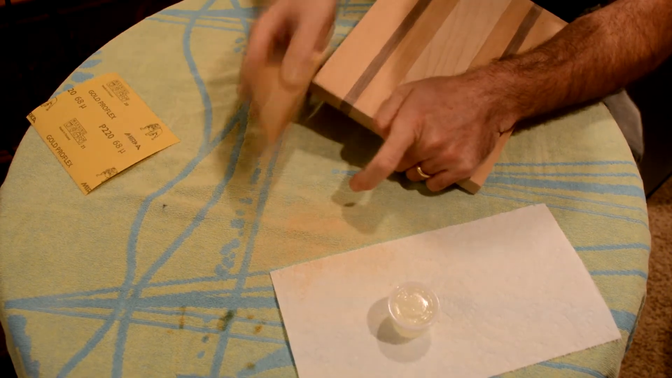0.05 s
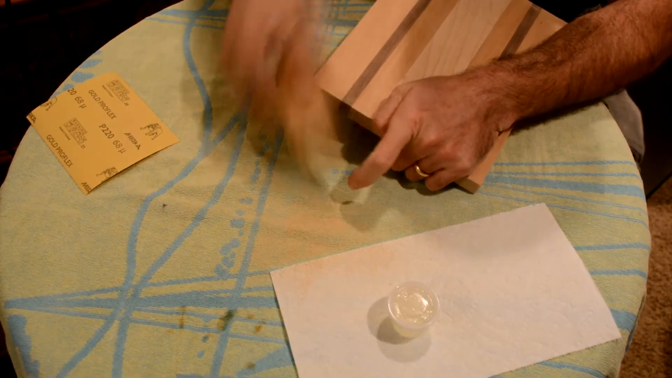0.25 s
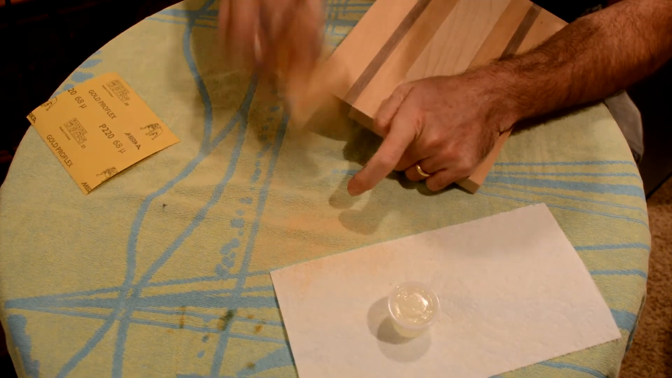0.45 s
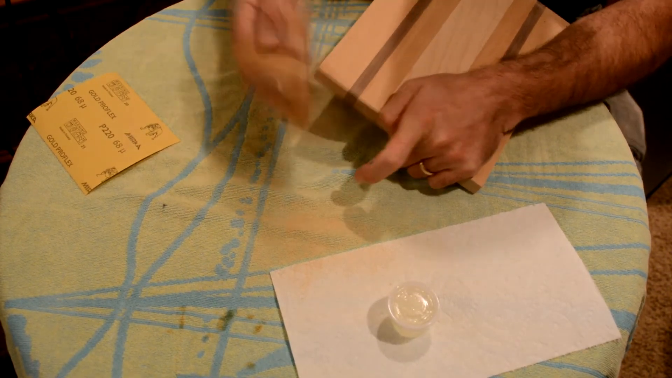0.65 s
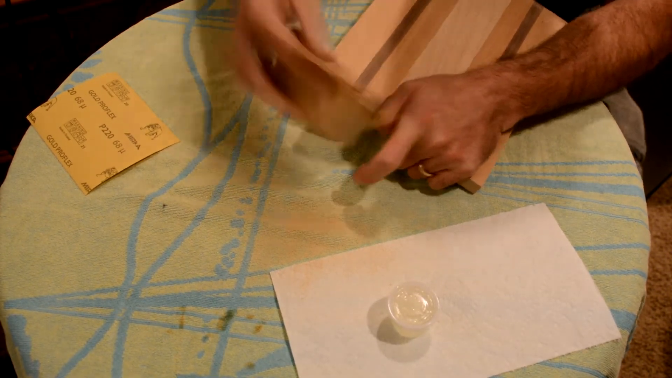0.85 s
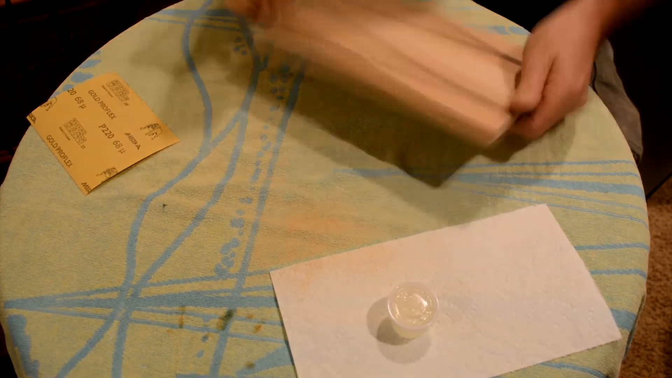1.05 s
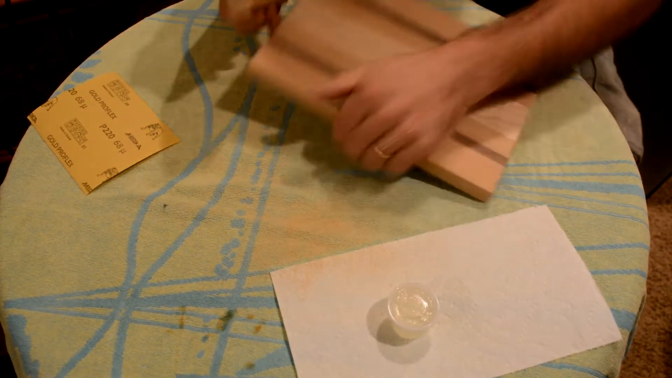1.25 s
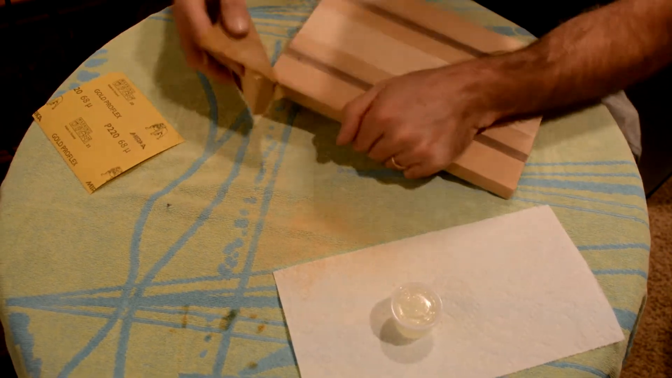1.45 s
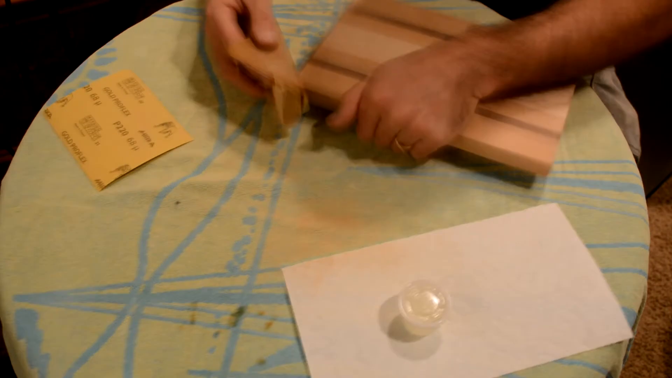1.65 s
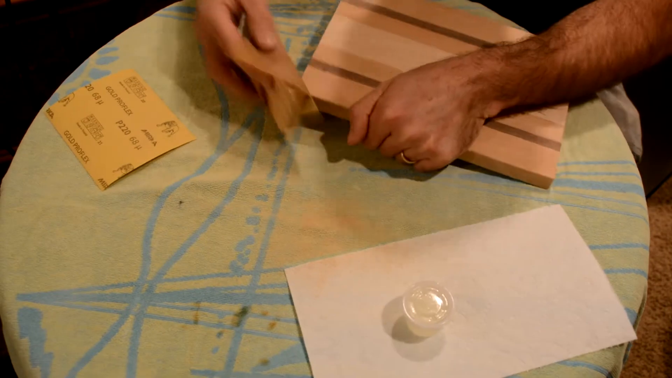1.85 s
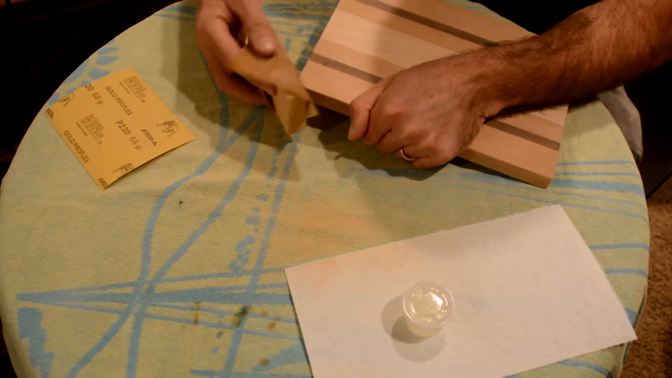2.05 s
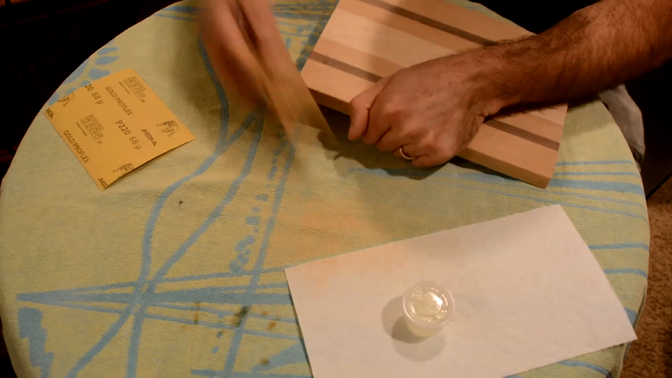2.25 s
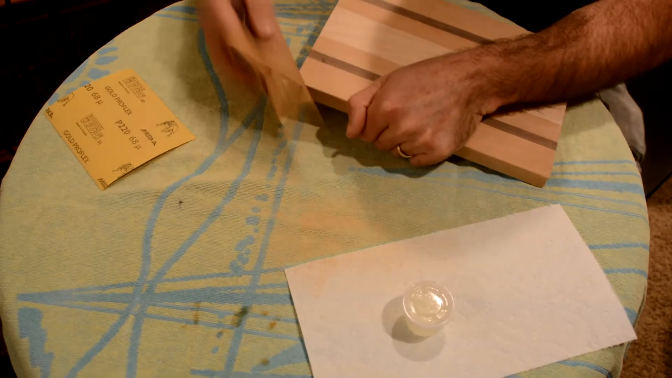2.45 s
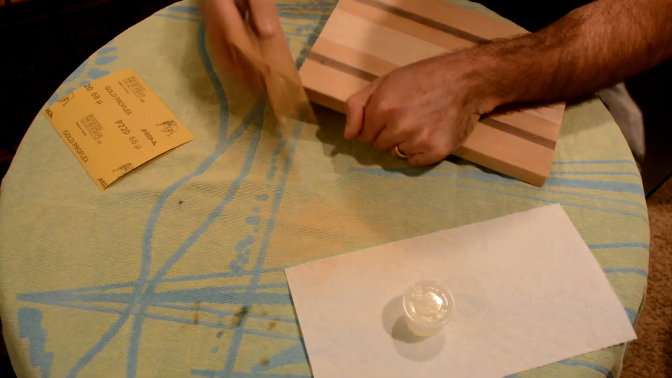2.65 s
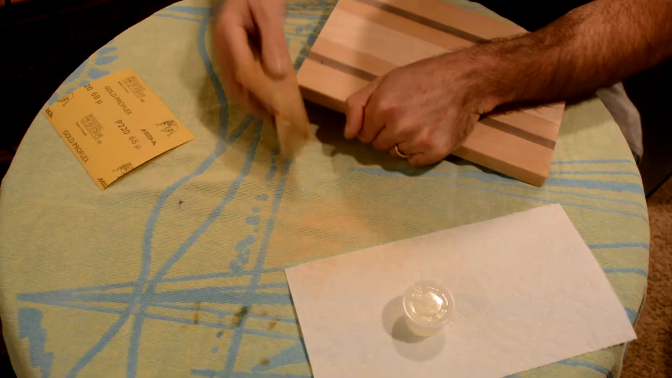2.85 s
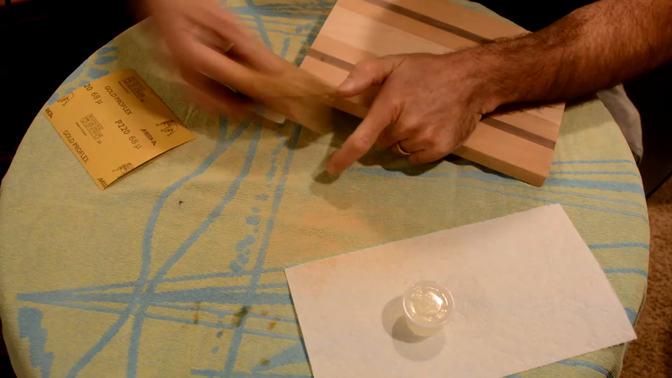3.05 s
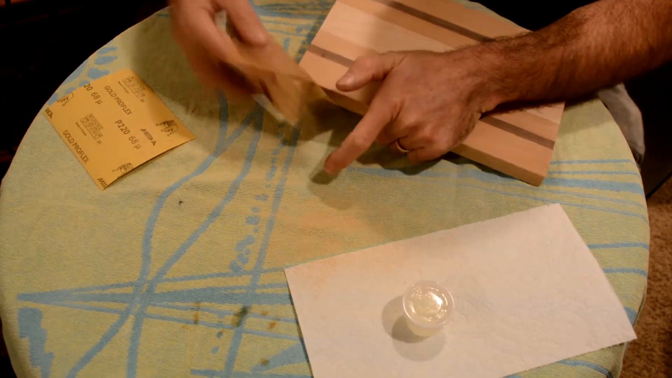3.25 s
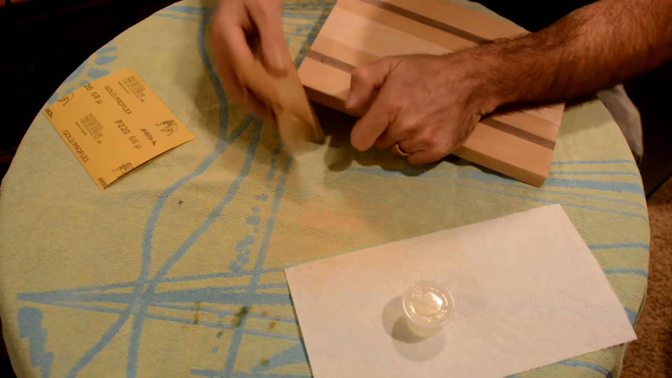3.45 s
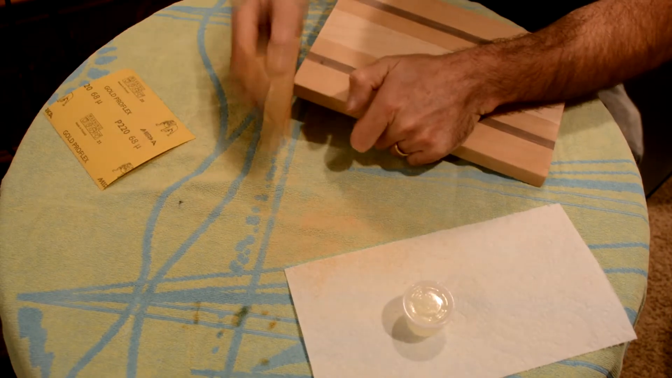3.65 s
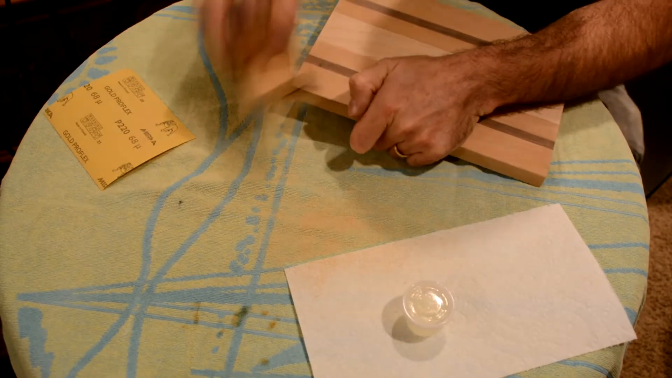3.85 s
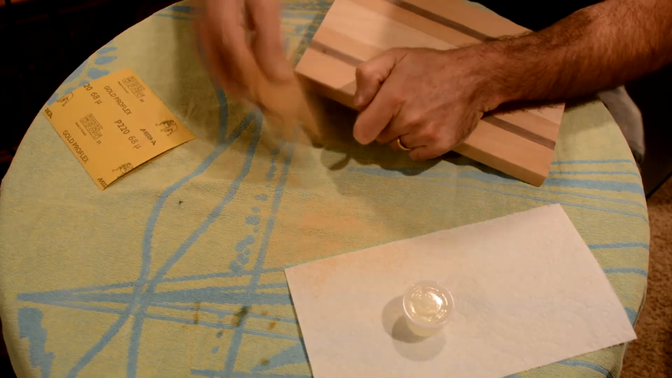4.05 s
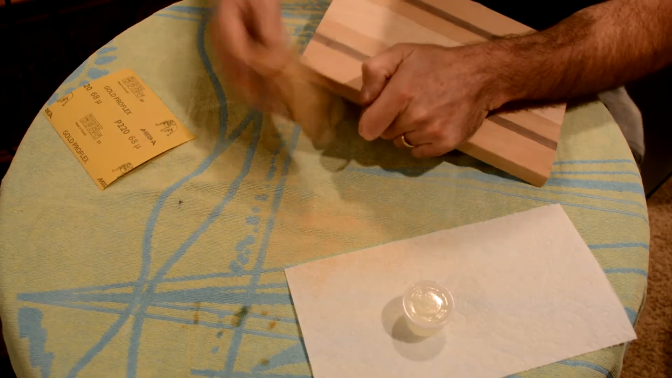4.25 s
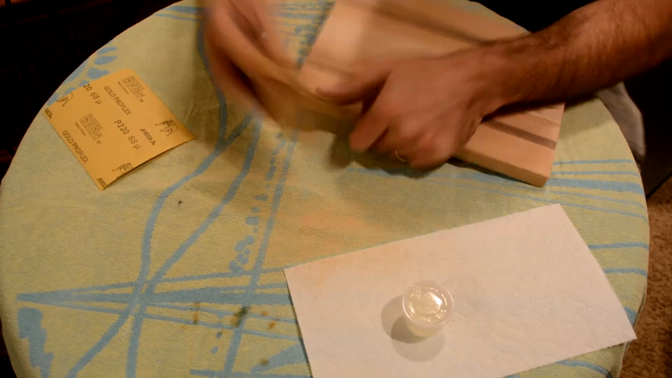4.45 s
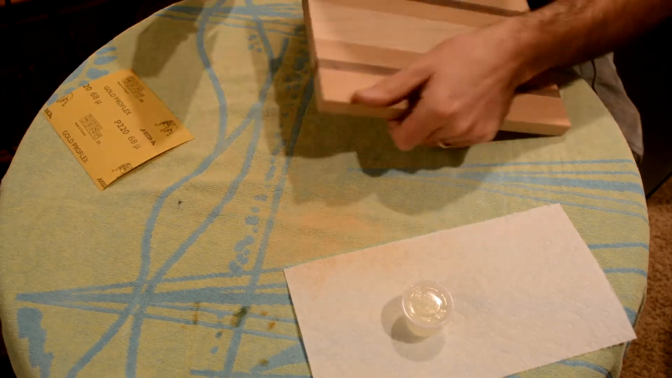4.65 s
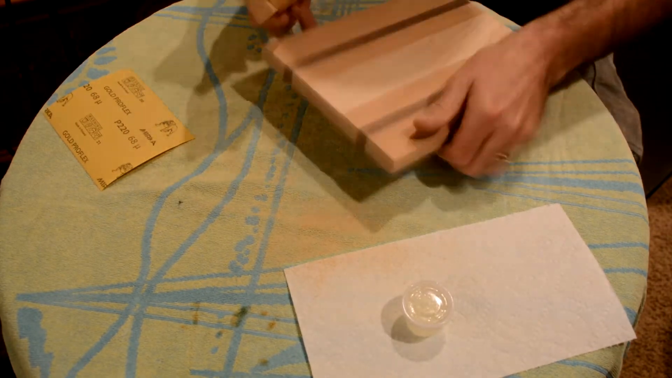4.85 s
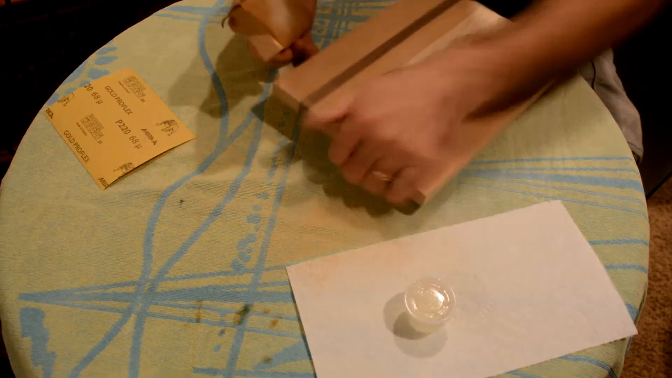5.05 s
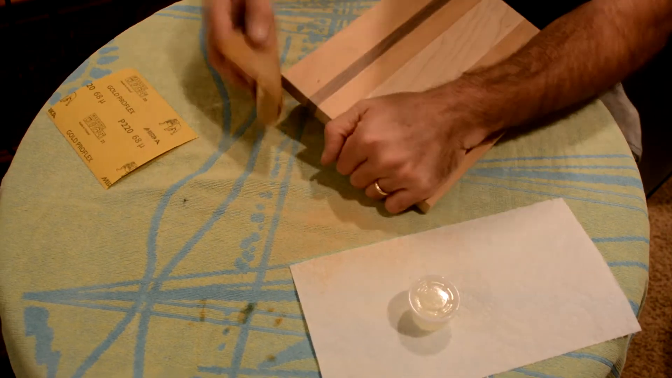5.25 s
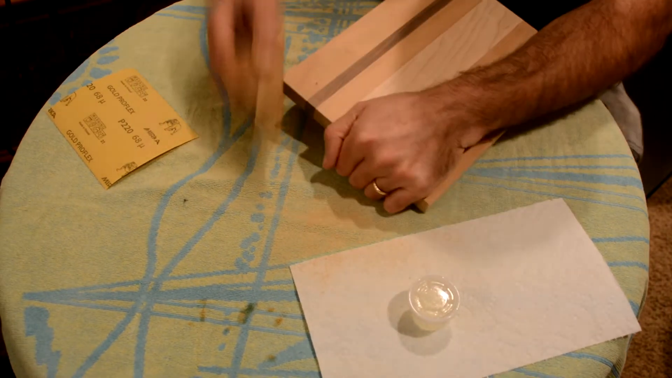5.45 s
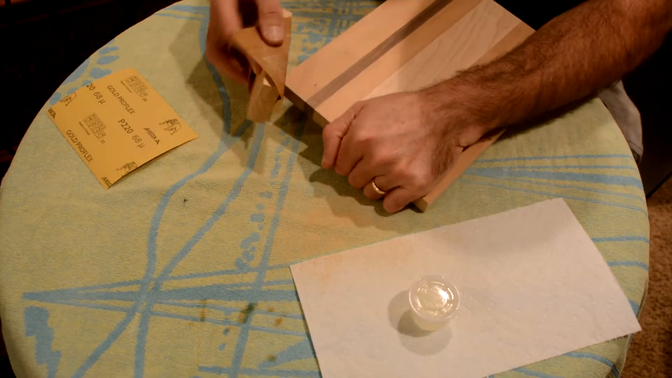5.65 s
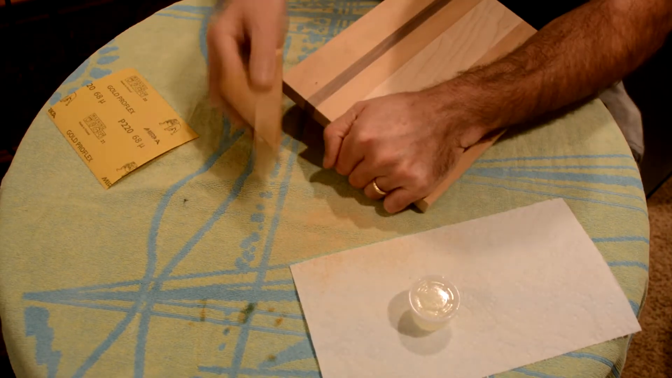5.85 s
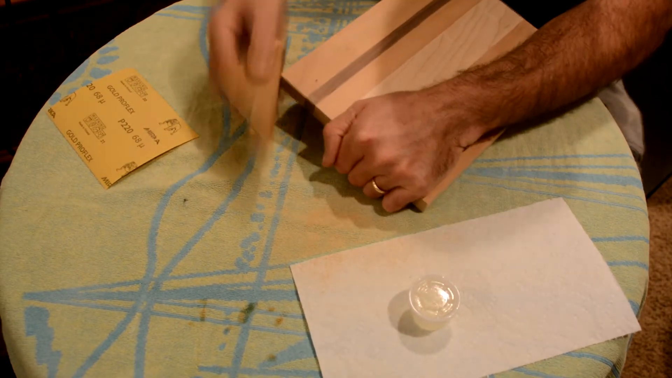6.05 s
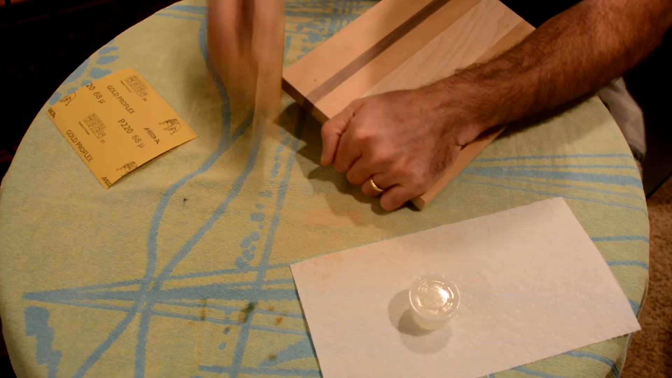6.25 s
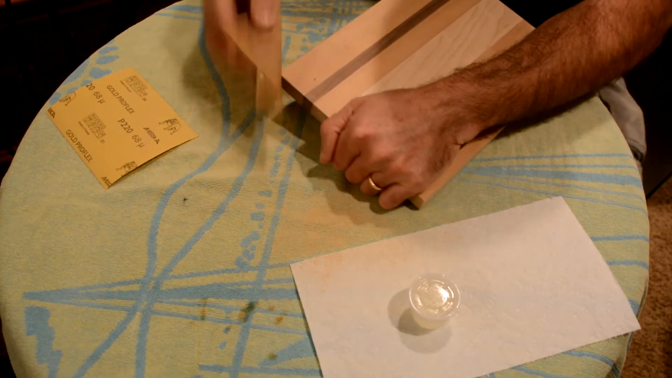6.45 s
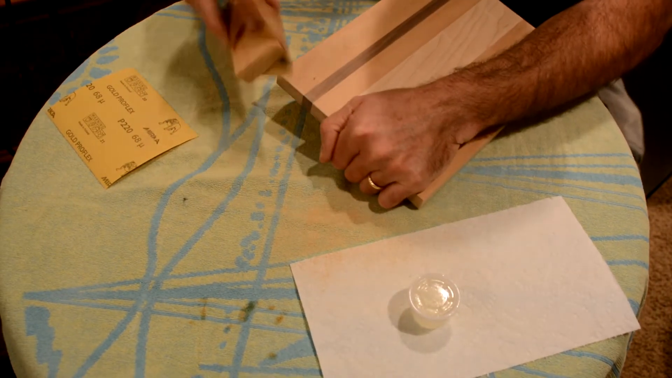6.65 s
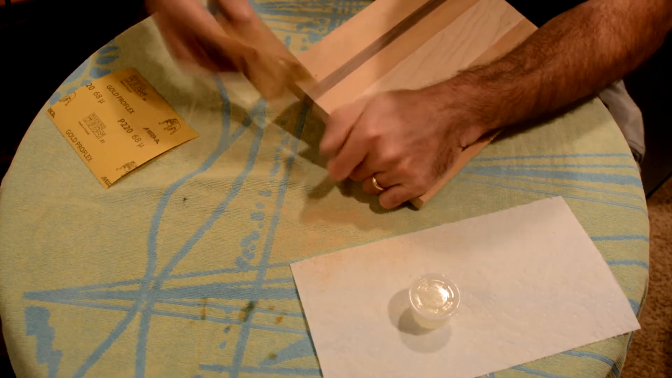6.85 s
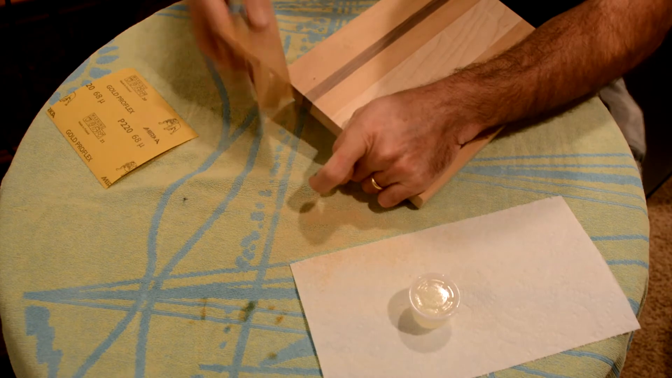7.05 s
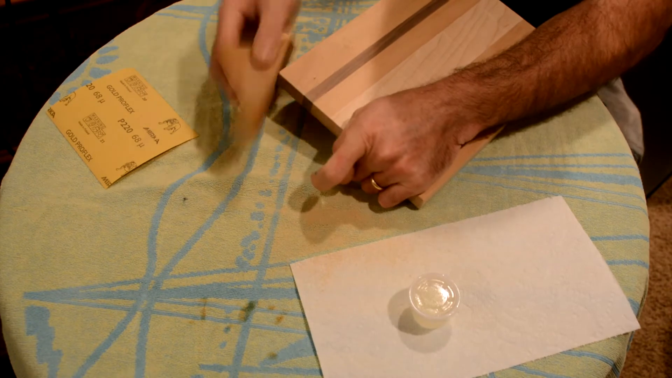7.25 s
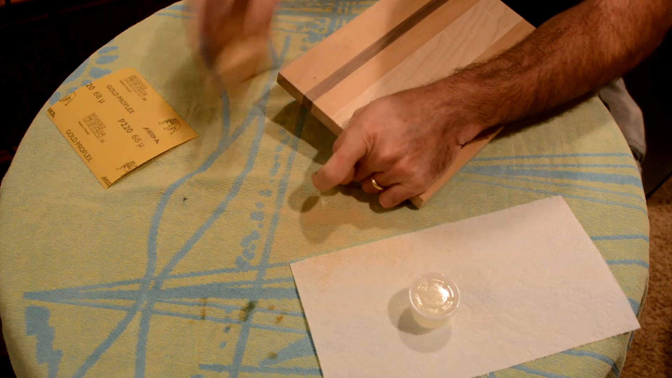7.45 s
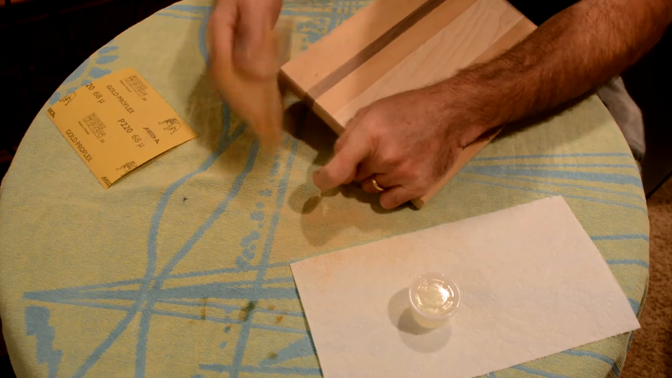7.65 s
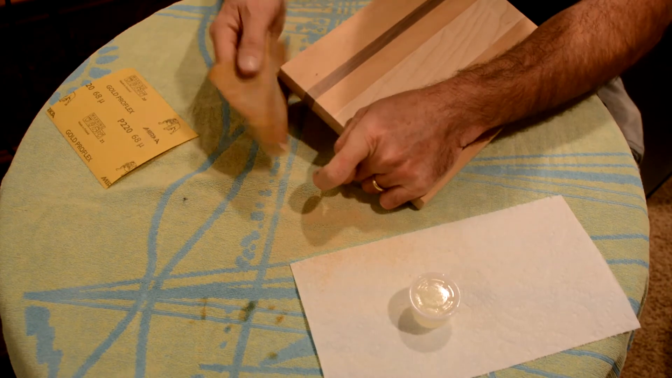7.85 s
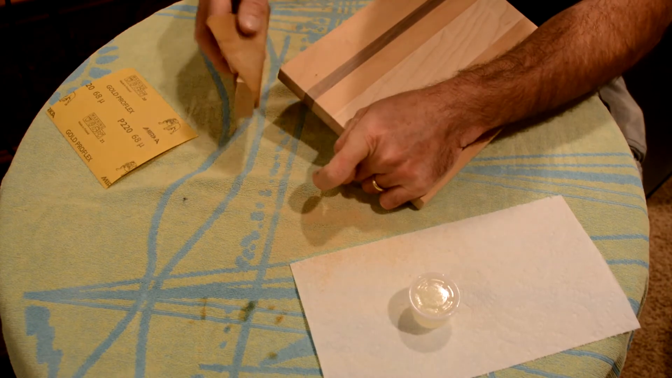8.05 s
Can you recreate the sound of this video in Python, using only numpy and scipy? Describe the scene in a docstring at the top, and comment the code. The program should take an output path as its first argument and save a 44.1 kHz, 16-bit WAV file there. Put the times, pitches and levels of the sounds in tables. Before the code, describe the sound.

A wooden board is sanded by hand, close up in stereo, in a quiet, fairly dry shop with low room rumble and faint hiss. A bright, very fast scrub lasts until 0.2 s, then separate hollow scratchy wipes with light paper landings run from 0.3 to 0.9 s. From about 1 to 1.4 s rubbing stops: a tiny snap, faint finger slides and muffled bumps on the padded table. Firm short wipes begin at 1.45 s, with a thud near 1.75, leading into rapid woody scrubbing at 1.85-2.1, 2.2-2.95 and 3.05-3.9 s. Three strong wipes near 4 s precede another short scrub to 4.5 s. A quiet turn follows, with a soft double bump around 4.9 s. Duller, fuller scrubs come at 5.4-5.65, 5.8-6.65 and 6.8-7.5 s. Separate corner wipes finish from 7.6 s, with a tap at 7.8 and the strongest rasp around 7.9, fading just after 8 s.

```python
"""A quiet shop, close to a wooden board on a cloth-covered table, sandpaper scrubbed by hand, in stereo.
A short scrub on the first edge, loose wipes, then the board is turned under the fingers and bumps the table.
Firm wipes and long scrubs on the second edge follow, a second turn, scrubs on the third edge, corner wipes.
Each stroke is a hail of grain impacts: it rings the board's resonances and makes the paper hiss above them.
Thuds are decaying table modes, landings and snaps are noise bursts; a low room tone runs throughout."""
import sys
import numpy as np
from scipy import signal
from scipy.fft import irfft
from scipy.io import wavfile

SR = 44100
rng = np.random.default_rng(int(sys.argv[2]) if len(sys.argv) > 2 else 0)


def persist_wave(psi):
    """Save psi, clipped to +-1, as 16-bit WAV."""
    counts = np.round(np.clip(psi, -1, 1) * 32767).astype(np.int16)
    wavfile.write(sys.argv[1], SR, np.atleast_2d(counts).T)


N = 357651  # samples
TAPS = 4096  # filter length, samples
HZ = np.fft.rfftfreq(TAPS, 1 / SR)
T = np.arange(N) / SR


def amp(db):
    """Decibels to gain."""
    return 10 ** (np.asarray(db) / 20)


def unit(x):
    """Scales to rms 1."""
    return x / np.sqrt(np.mean(x ** 2) + 1e-20)


def read(points, hz):
    """Reads (Hz, value) points on a log-frequency axis."""
    point_hz, value = np.transpose(points)
    return np.interp(np.log(hz + 1), np.log(point_hz), value)


def add(mix, start_s, sound):
    """Mixes a sound in at start_s."""
    part = mix[max(round(start_s * SR), 0):][:len(sound)]
    part += sound[:len(part)]


def colour(x, gain):
    """Causal minimum-phase filter with the given gain at the frequencies HZ."""
    log_gain = np.log(np.maximum(gain, 1e-5))
    circle = np.r_[log_gain, log_gain[-2:0:-1]]
    minimum_phase = np.exp(np.conj(signal.hilbert(circle)))
    response = irfft(minimum_phase[:len(HZ)])
    return signal.oaconvolve(x, response)[:len(x)]


def in_band(gain, lo, hi):
    """Scales a filter so that white noise leaves it with rms 1 between lo and hi (Hz)."""
    band = (HZ > lo) & (HZ < hi)
    return gain / np.sqrt(np.mean(gain ** 2 * band))


def wander(rate):
    """Smooth chance of rms 1 that changes about rate times a second."""
    knots = rng.standard_normal(N // 16)
    return unit(np.interp(T * rate, np.arange(len(knots)), knots))


# the hold in force from each moment of the work: start_s, hold
WORK = [(0, "first edge"), (.24, "loose wipe"), (.97, "fingers"), (1.42, "firm wipe"),
        (2.12, "second edge"), (3.92, "firm wipe"), (4.6, "fingers"), (5.26, "third edge"),
        (7.53, "corner wipe")]
# how wide the rubbing sounds: freq_hz, side_minus_mid_db
WIDTH = [(40, -7), (150, -10), (500, -14), (1000, -13.5), (2000, -12), (5000, -12.5), (9000, -13),
         (12500, -5.5), (16000, -5)]


def sanding(board_trim_db=-3.5, hiss_trim_db=-3.0, split_hz=3100, chatter_db=0.04, catch_db=0.58,
            board_span=0.95, hiss_span=0.85, hiss_lag=0.15):
    """Grit drives board resonances below the split and paper hiss above it; returns mid and side."""
    # the paper catches and lets go
    grip = unit(amp(chatter_db * wander(270) + catch_db * wander(90)))
    on_wood = grit(per_s=10000, spread_db=1.85)
    on_paper = grit(per_s=28000, spread_db=1.4)
    wood_share = 1 / (1 + (HZ / split_hz) ** 4)
    widths = [1, amp(read(WIDTH, HZ))]
    out = np.zeros((2, N))
    for middle, length, board_db, hiss_db in strokes():
        hold = [name for start, name in WORK if start <= middle][-1]
        centre = round(middle * SR)
        span = slice(max(centre - TAPS, 0), centre + 2 * TAPS)
        # slack paper bites first and hisses as it is pulled taut
        lag = hiss_lag * length * (hold == "loose wipe")
        board_power = stroke_power(T[span], middle, length * board_span)
        hiss_power = stroke_power(T[span], middle + lag, length * hiss_span)
        board = amp(board_db + board_trim_db) * grip[span] * np.sqrt(board_power)
        hiss = amp(hiss_db + hiss_trim_db) * grip[span] * np.sqrt(hiss_power)
        gain = stroke_colour(hold)
        wood = in_band(gain * np.sqrt(wood_share), 400, 2400)
        paper = in_band(gain * np.sqrt(1 - wood_share), 4000, 14000)
        for channel, width in enumerate(widths):
            # every stroke meets fresh grains, and so does the side signal: they lie all along the edge
            fresh = (rng.integers(N) + np.arange(len(board))) % N
            out[channel, span] += colour(on_wood[fresh] * board, wood * width)
            out[channel, span] += colour(on_paper[fresh] * hiss, paper * width)
    return out


# bouts of scrubbing; an accent is how far the first direction lies above the mean, levels precede the trims:
# first_stroke_s, last_stroke_s, strokes_per_s, quickening_share, board_db, hiss_db,
# board_accent_db, hiss_accent_db, lean_in_s, last_stroke_db
SCRUBS = [(.055, 0.17, 26, -.05, -39.5, -38, -1, -2.5, 0.0053, -1),
          (1.853, 2.073, 22.3, 0.0083, -36.5, -41.5, 1.7, 0.2, 0.074, -3.5),
          (2.232, 2.956, 22, .035, -37.5, -39, -1, -1, .04, -4),
          (3.046, 3.87, 26.8, 0.032, -38, -41, 1.5, 1.4, 0.057, -0.5),
          (4.236, 4.489, 20, .05, -38.5, -41.5, -3.5, -1, 0.0077, 0.5),
          (5.395, 5.664, 22.4, .03, -37, -42, 0.5, 1.2, 0.076, -13.5),
          (5.802, 6.649, 21.2, 0.049, -36.5, -40, -0.1, -1.2, .14, 0),
          (6.829, 7.475, 23.2, .09, -38.1, -42.5, -1.2, 0.3, 0.15, 2)]
# single wipes of the paper, before the trims: middle_s, length_s, board_db, hiss_db
WIPES = [(0.013, 0.03, -41.5, -45.5), (0.312, 0.033, -38, -45.5), (.424, 0.035, -38.5, -48),
         (.527, 0.031, -40.5, -49), (0.675, 0.043, -36, -45.5), (0.786, 0.036, -35.5, -44),
         (0.89, 0.033, -35, -39.5), (1.454, .022, -47, -46), (1.529, 0.068, -46, -55),
         (1.567, 0.026, -39, -53), (1.615, 0.026, -37.5, -48.5), (1.664, 0.032, -50.5, -55.5),
         (1.722, .022, -37, -45.5), (1.788, 0.03, -48, -52), (2.164, 0.016, -45, -58.5),
         (3.987, 0.031, -33, -44.5), (4.094, 0.03, -35.5, -48), (4.185, 0.029, -37, -48.5),
         (5.32, 0.05, -53, -56.5), (7.598, 0.036, -38, -47.5), (7.707, 0.04, -40.5, -47.5),
         (7.848, 0.048, -41.5, -51), (7.921, 0.086, -30, -41.5), (7.975, 0.085, -36, -50),
         (8.035, 0.061, -48, -48)]
# the board slides under the fingers as it is turned, before the trims: middle_s, length_s, board_db, hiss_db
SLIDES = [(1.041, 0.032, -54, -63), (1.149, 0.071, -60, -65), (1.235, 0.04, -61.5, -67.5),
          (1.345, 0.036, -60, -62.5), (4.769, 0.036, -75, -69), (4.829, 0.043, -61, -66),
          (4.934, 0.06, -76, -72), (5.008, 0.044, -67, -62.5), (5.077, 0.034, -61, -64),
          (5.118, 0.025, -65.5, -66.5), (5.166, 0.038, -67, -68.5)]


def strokes():
    """Every rub on the board: scrubbing, single wipes and sliding fingers."""
    scrubbing = [stroke for bout in SCRUBS for stroke in scrub(*bout)]
    return scrubbing + WIPES + SLIDES


LIGHT_TOUCH_DB = -7.5  # at the start of a bout, before the hand leans in
SAG_DB_PER_S = 1  # the pressure eases through a bout
UNEVEN_DB = 0.77  # no two strokes are pressed alike
HISS_FOLLOWS = 1.87  # dB of hiss for each dB that pressure adds to the board
STROKE_SHARE = .61  # part of the time between two turns in which the paper moves fast
SHORTER_PER_DB = .03  # a firmer stroke is also a quicker one
SLOWEST_DB = -3  # lighter strokes than this get no slower


def scrub(first, last, per_s, quickening, board_db, hiss_db, board_accent_db, hiss_accent_db, lean_s, last_db):
    """The hand leans in and swings to and fro at a drifting pace; returns rows like WIPES."""
    k = np.arange(round((last - first) * per_s) + 1)
    u, direction = k / k[-1], (-1.) ** k
    middle = first + (last - first) * (u + quickening * u * (1 - u))
    leaning = np.clip((first + lean_s - middle) / max(lean_s, 1e-6), 0, 1)
    press_db = LIGHT_TOUCH_DB * leaning
    press_db = press_db - SAG_DB_PER_S * (middle - middle.mean())
    press_db = press_db + last_db * (k == k[-1])
    press_db = press_db + UNEVEN_DB * rng.standard_normal(len(k))
    effort_db = press_db + board_accent_db * direction
    shortening = 1 - SHORTER_PER_DB * np.maximum(effort_db, SLOWEST_DB)
    length = STROKE_SHARE * np.gradient(middle) * shortening
    stroke_hiss_db = hiss_db + HISS_FOLLOWS * press_db + hiss_accent_db * direction
    return zip(middle, length, board_db + effort_db, stroke_hiss_db)


def stroke_power(t, middle, length):
    """The hand speeds up and slows down; the paper rustles faintly around the turn."""
    u = (t - middle) / length * 2
    return 2 ** (-abs(u) ** 2.2) + .003 * np.exp(-abs(u - .6) * 1.3)


def grit(per_s, spread_db):
    """Tiny impacts of abrasive grains: many small, a few large."""
    size = amp(spread_db * np.minimum(rng.exponential(1, N), 5))
    hit = rng.random(N) < per_s / SR
    return unit(size * rng.standard_normal(N) * hit)


# each way of holding board and paper has a broad spectrum: freq_hz, level_db
# and, in its MODES, nominal board resonances: freq_hz, width_hz, lift_db
FIRST_EDGE = [(70, -10), (160, -12.5), (330, -15), (650, -10), (1300, -5), (2500, -15.5), (5000, -8.5),
              (10500, -15), (15500, -23)]
FIRST_EDGE_MODES = [(586, 100, 7.7), (2170, 48, 11), (3270, 51, 12), (4600, 200, 6.6), (6300, 48, 5.5)]
LOOSE_WIPE = [(70, -7.5), (160, -8), (330, -18), (650, -13), (1300, -4.5), (2500, -18), (5000, -22),
              (10500, -26), (15500, -37)]
LOOSE_WIPE_MODES = [(300, 114, 14.4), (603, 150, 11.3), (1158, 58, 9.2), (1770, 47, 6.6), (2105, 84, 12.2),
                    (3129, 770, 6.5), (4110, 750, 6.8), (5080, 980, 6.9)]
FINGERS = [(70, 6), (160, -36), (330, -20), (650, -15), (1300, -17), (2500, -19), (5000, -15), (10500, -21),
           (15500, -27)]
FINGERS_MODES = [(1117, 60, 9.4), (1434, 130, 11.5), (2090, 270, 7.3), (2880, 68, 6.5), (3140, 230, 13),
                 (4450, 300, 6.6), (5130, 66, 5.2)]
FIRM_WIPE = [(70, -11.5), (160, -12.5), (330, -13.5), (650, -9.5), (1300, -20.5), (2500, -24.5),
             (5000, -19), (10500, -24), (15500, -35)]
FIRM_WIPE_MODES = [(702, 120, 8.9), (929, 70, 12.1), (1138, 115, 10.2), (1334, 296, 14.2), (1700, 84, 13.9),
                   (2133, 450, 9.3), (3150, 540, 12.5), (3620, 720, 4.5), (4320, 500, 4.6),
                   (5060, 850, 5.9)]
SECOND_EDGE = [(70, -11.5), (160, -16.5), (330, -14), (650, -3.5), (1300, -14.5), (2500, -22.5),
               (5000, -25), (10500, -24), (15500, -37)]
SECOND_EDGE_MODES = [(943, 38, 11), (1163, 80, 6.0), (1322, 164, 10), (1672, 120, 10.3), (2064, 28, 9.6),
                     (3090, 510, 12.7), (3730, 460, 4.4), (4260, 420, 4.9), (5080, 970, 9),
                     (6370, 740, 3.3)]
THIRD_EDGE = [(70, -11), (160, -3.5), (330, -9), (650, -3.5), (1300, -19.5), (2500, -14), (5000, -9.5),
              (10500, -14.5), (15500, -25)]
THIRD_EDGE_MODES = [(788, 41, 9.5), (924, 110, 4.5), (1095, 330, 12), (1432, 157, 13.4), (1687, 120, 9.2),
                    (1940, 470, 12.8), (2280, 630, 9.2), (2584, 89, 5.2), (3015, 295, 8.6),
                    (3890, 820, 4.6)]
CORNER_WIPE = [(70, -12), (160, -10.5), (330, -5), (650, -17.5), (1300, -21), (2500, -14), (5000, -17.5),
               (10500, -27), (15500, -35)]
CORNER_WIPE_MODES = [(710, 92, 5.7), (847, 144, 15.7), (1107, 98, 15.3), (1397, 380, 16), (2020, 420, 10.2),
                     (3040, 350, 7.3), (5000, 325, 3.3)]
# hold name: its spectrum, its modes
HOLDS = {"first edge": (FIRST_EDGE, FIRST_EDGE_MODES), "loose wipe": (LOOSE_WIPE, LOOSE_WIPE_MODES),
         "fingers": (FINGERS, FINGERS_MODES), "firm wipe": (FIRM_WIPE, FIRM_WIPE_MODES),
         "second edge": (SECOND_EDGE, SECOND_EDGE_MODES), "third edge": (THIRD_EDGE, THIRD_EDGE_MODES),
         "corner wipe": (CORNER_WIPE, CORNER_WIPE_MODES)}
# the table under the board colours every stroke, nominally: freq_hz, width_hz, lift_db
TABLE_LIFT = [(104, 66, 4.5), (184, 23, 3), (265, 15, 4)]


def stroke_colour(hold, mode_swing=0.13, shift=0.02, ripple_db=1.75, ripple_hz=80, low_hz=42):
    """The point of contact moves: every stroke drives the resonances a little differently."""
    spectrum, modes = HOLDS[hold]
    lift_db = 0
    for hz, width, db in [*modes, *TABLE_LIFT]:
        peak_db = db * (1 + mode_swing * rng.standard_normal())
        peak_hz = hz * (1 + shift * rng.uniform(-0.87, 1))
        lift_db = lift_db + peak_db / (1 + (2 * (HZ - peak_hz) / width) ** 2)
    # the bent paper has many small resonances of its own
    knots = rng.standard_normal(len(HZ))
    ripple = ripple_db * np.interp(HZ / ripple_hz, np.arange(len(knots)), knots)
    low_cut = HZ ** 2 / (HZ ** 2 + low_hz ** 2)
    return amp(read(spectrum, HZ) + lift_db + ripple) * low_cut


# moments when the loosely held board rings: middle_s, length_s, pitch_hz, peak_db
RINGS = [(1.043, 0.015, 1104, -50.5), (1.088, 0.033, 840, -58), (1.714, 0.011, 528, -45),
         (1.722, 0.0071, 1207, -39), (1.717, 0.016, 3164, -44), (4.762, 0.026, 3530, -63),
         (4.833, 0.041, 1460, -60), (4.918, 0.04, 1440, -62), (5.071, 0.12, 1460, -66),
         (8.052, 0.042, 1070, -51)]


def rings(width_hz=40):
    """Rubbed while it is held loosely, the board rings briefly at one of its modes."""
    out, t = np.zeros(N), T[:SR // 4]
    for middle, length, hz, db in RINGS:
        ring = rng.standard_normal(len(t)) * np.sqrt(stroke_power(t, t.mean(), length))
        for bandwidth in (width_hz, 2 * width_hz):
            ring = signal.lfilter(*signal.iirpeak(hz, hz / bandwidth, SR), ring)
        add(out, middle - t.mean(), amp(db) * ring / abs(ring).max())
    return out


# the paper lands on the edge at the start of a wipe, before the gain: start_s, level_db
LANDINGS = [(.284, -27), (.388, -30), (.491, -33), (.744, -28.5), (.761, -36), (.85, -28.5), (3.95, -29.5),
            (4.063, -26.5), (4.154, -32), (6.777, -38), (7.557, -40), (7.668, -32), (7.811, -24.5)]
# the colour of a landing: freq_hz, level_db
LANDING_COLOUR = [(60, -12), (200, 11), (450, 1), (750, 11.5), (1250, 1.5), (1800, -39), (4000, -15.5),
                  (15000, -31)]
# the stiff paper snaps or a coarse grain breaks off: start_s, peak_db
SNAPS = [(.68, -32), (.981, -31.5), (3.02, -37), (3.955, -36), (5.301, -46), (7.793, -39)]
# the colour of a snap: freq_hz, level_db
SNAP_COLOUR = [(150, -24), (600, -3), (1500, -2), (4000, 0), (5500, -8), (9000, -7), (16000, -14)]


def taps(rows, spectrum, fall_s, gain_db):
    """Short bursts of paper noise with a sudden start and an exponential fall."""
    out, t = np.zeros(N), T[:TAPS]
    for start, db in rows:
        noise = rng.standard_normal(TAPS) * np.exp(-t / fall_s)
        burst = colour(noise, amp(read(spectrum, HZ)))
        add(out, start, amp(db + gain_db) * burst / abs(burst).max())
    return out


# the board bumps the padded table, level before the gain: start_s, level_db, contact_s
BUMPS = [(1.119, -28, 0.0015), (1.149, -45, 0.0089), (1.231, -33, 0.0039), (1.245, -27.5, 0.0024),
         (1.26, -38, 0.023), (1.377, -39.5, 0.02), (1.745, -28, 0.0047), (1.776, -46, 0.031),
         (4.884, -31.5, 0.008), (4.898, -29.5, 0.002), (4.929, -42, 0.0053), (7.813, -39, 0.0014)]
# nominal modes of table and board together: freq_hz, level_db, t60_s
TABLE_MODES = [(33.8, -6.5, 0.25), (61.6, -8.5, 0.15), (91, -2, 0.11), (124.2, 2, 0.14), (179.6, -1, 0.18),
               (270, 0.5, 0.074), (375, -3, 0.084), (480, 1.5, 0.035), (696, -1.5, 0.08), (1130, -4, 0.08)]


def bumps(gain_db=-2.5):
    """A push softened by the cloth rings the table; a longer contact gives a duller thud."""
    out, t = np.zeros(N), T[:SR // 2]
    for start, db, contact in BUMPS:
        ring = np.zeros(len(t))
        for k, (hz, mode_db, t60) in enumerate(TABLE_MODES):
            swing = (-1) ** k  # neighbouring modes swing opposite ways
            bump_hz = hz * rng.uniform(0.842, 1.042)
            ring += swing * amp(mode_db - 60 * t / t60) * np.sin(2 * np.pi * bump_hz * t)
        u = t / (contact / 4)
        push = u * np.exp(-u)
        thud = signal.fftconvolve(ring, push)[:len(t)]
        add(out, start, amp(db + gain_db) * thud / abs(thud).max())
    return out


def scatter(t60):
    """Response of many small reflections, each band dying at its own speed."""
    hz, t, z = signal.stft(rng.standard_normal(SR // 2), SR, nperseg=128)
    decay = amp(-60 * t / read(t60, hz)[:, None])
    tail = signal.istft(z * decay, SR, nperseg=128)[1]
    tail = np.r_[np.zeros(SR // 1000), tail]  # 1 ms behind the direct sound
    return tail / np.linalg.norm(tail)


def echo(x, t60):
    """The sound as it comes back from surfaces around it."""
    return signal.oaconvolve(x, scatter(t60))[:N]


# spectrum of the empty shop: freq_hz, relative level_db per Hz
ROOM_TONE = [(12, -33), (20, 6.5), (65, -2.5), (113, -2), (357, -18.5), (738, -19), (873, -22),
             (1530, -28.5), (2390, -26), (2910, -30), (4300, -30.5), (8650, -34.5), (14300, -34),
             (16000, -45)]
ROOM_TONE_DB = -65  # rms level around which it swells


def room_tone(swell_db=-3.0):
    """Low rumble of the shop with a faint hiss, gently swelling, much of it shared by both ears."""
    gain = amp(read(ROOM_TONE, HZ))
    shared, left, right = (unit(colour(rng.standard_normal(N), gain)) for _ in range(3))
    level = amp(ROOM_TONE_DB + swell_db * wander(1.67))
    return level * unit(shared + .5 * np.array([left, right]))


# how fast the shop's reverberation dies: freq_hz, t60_s
ROOM_T60 = [(100, 0.43), (500, 0.067), (2000, 0.25), (8000, 0.35), (16000, 0.077)]
# how the close sound leans to one side: freq_hz, left_minus_right_db
LEAN = [(30, 2), (70, 6.5), (150, 1.5), (500, 1.5), (1000, 0.5), (4000, 0.5), (12000, -0.9)]


def scene(near_db=-16, near_t60=0.083, room_db=-26, bump_side_db=-10):
    """Direct sound up close, reflections off table and arms, and a faint room."""
    near = [(1, near_t60)]  # the same decay at all frequencies
    rubbing, side = sanding()
    landings = taps(LANDINGS, LANDING_COLOUR, fall_s=0.013, gain_db=-4.5)
    snaps = taps(SNAPS, SNAP_COLOUR, fall_s=.0005, gain_db=0)
    knocks = bumps() + landings
    direct = rubbing + knocks + rings() + snaps
    mid = direct + amp(near_db) * echo(direct, near)
    side = side + amp(bump_side_db) * echo(knocks, near)
    ears = []
    for sign in (1, -1):  # left, right
        close = colour(mid + sign * side, amp(sign * read(LEAN, HZ) / 2))
        ears.append(close + amp(room_db) * echo(direct, ROOM_T60))
    return np.array(ears) + room_tone()


EDGE_HZ = 15850  # upper limit of the recorder


def record(dry):
    """The recorder's band limit: a steep linear-phase low-pass."""
    low_pass = signal.firwin(511, EDGE_HZ, window=("kaiser", 9), fs=SR)
    return signal.oaconvolve(dry, low_pass[None], "same")


dry = scene()
out = record(dry)
persist_wave(out)
```